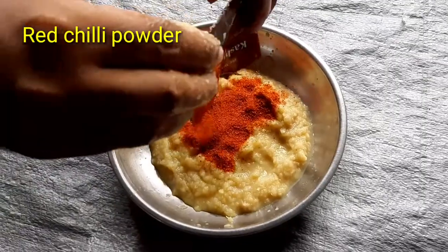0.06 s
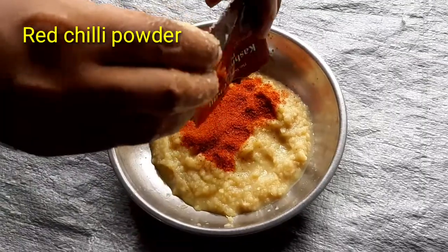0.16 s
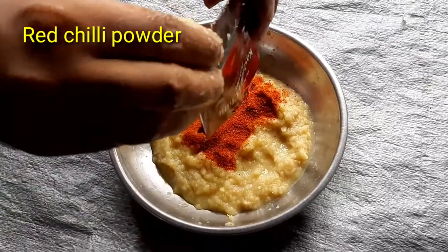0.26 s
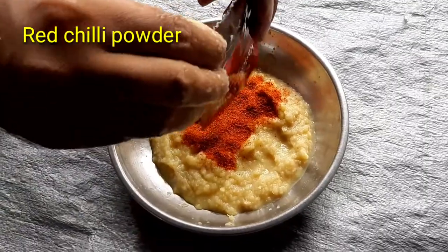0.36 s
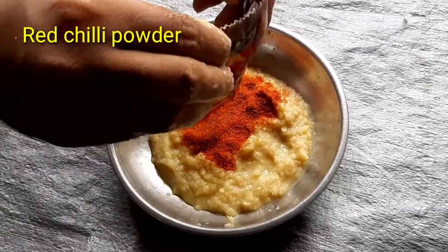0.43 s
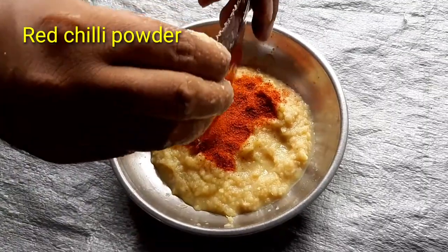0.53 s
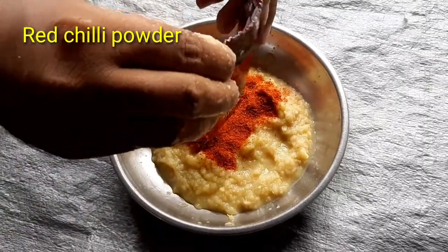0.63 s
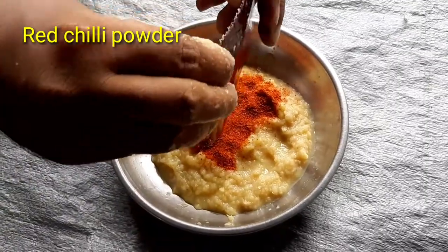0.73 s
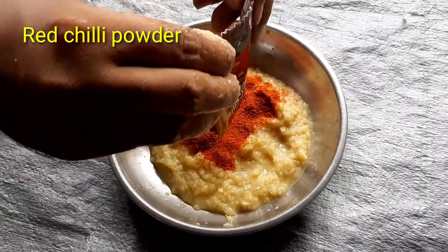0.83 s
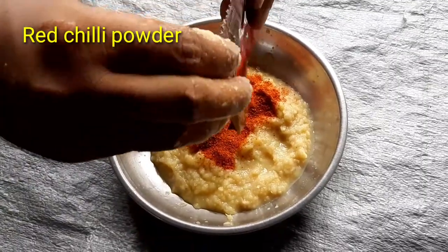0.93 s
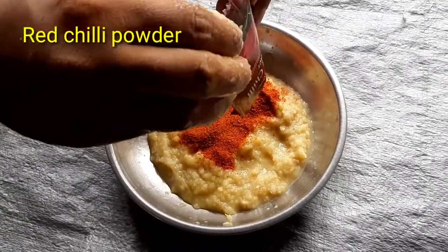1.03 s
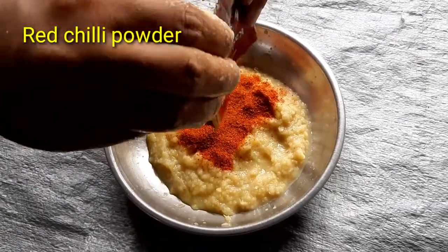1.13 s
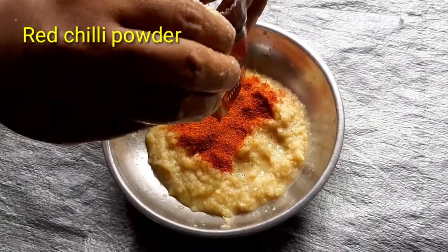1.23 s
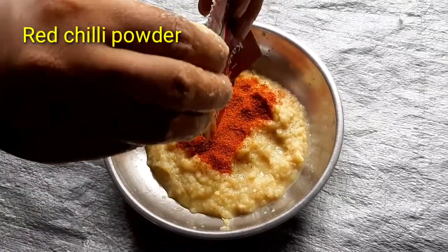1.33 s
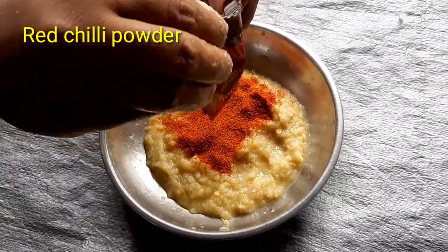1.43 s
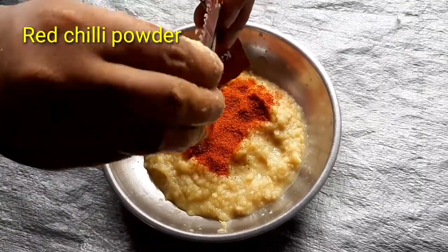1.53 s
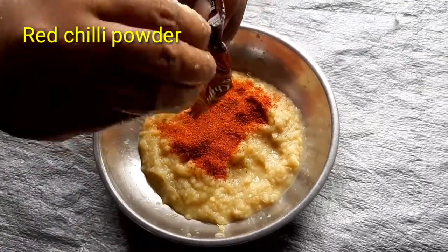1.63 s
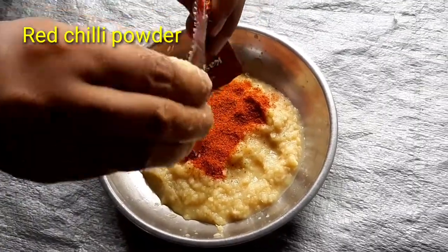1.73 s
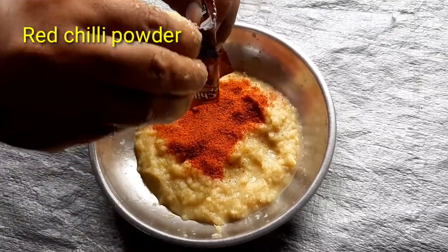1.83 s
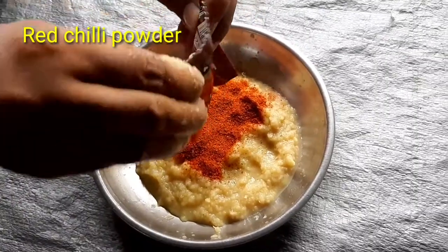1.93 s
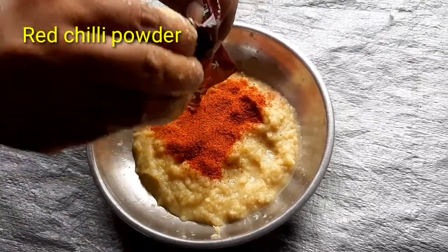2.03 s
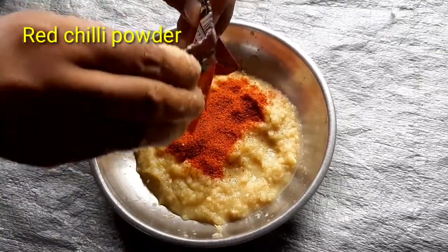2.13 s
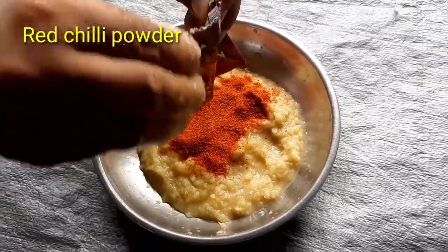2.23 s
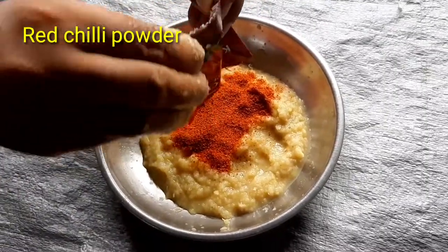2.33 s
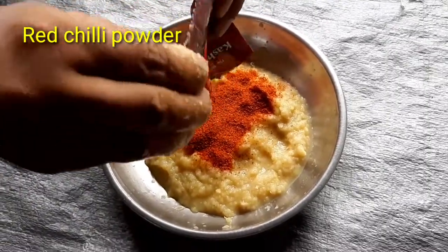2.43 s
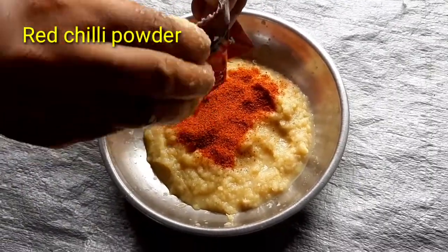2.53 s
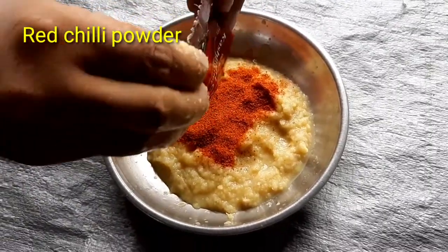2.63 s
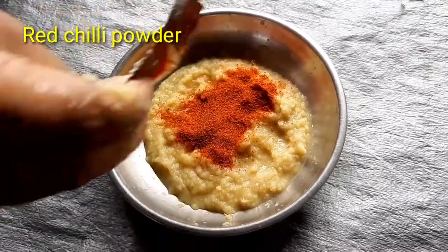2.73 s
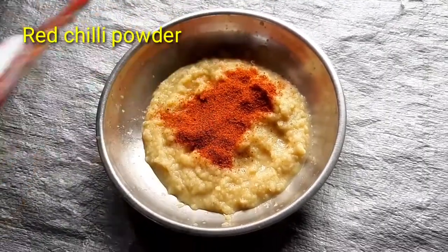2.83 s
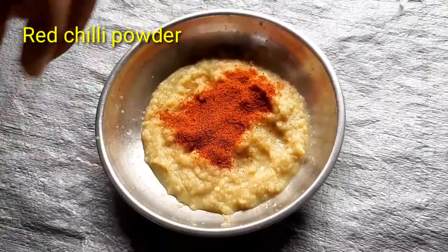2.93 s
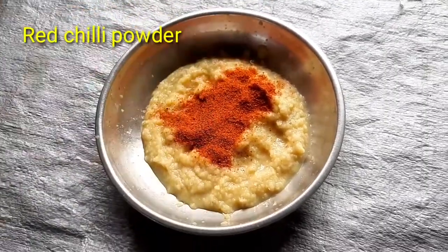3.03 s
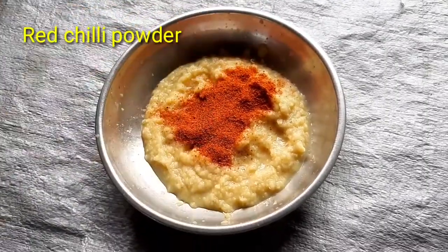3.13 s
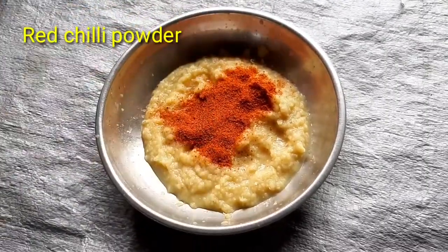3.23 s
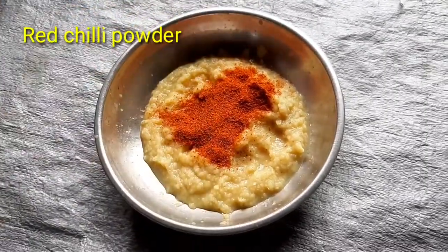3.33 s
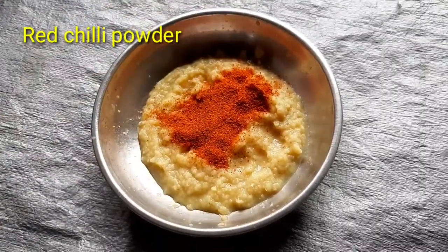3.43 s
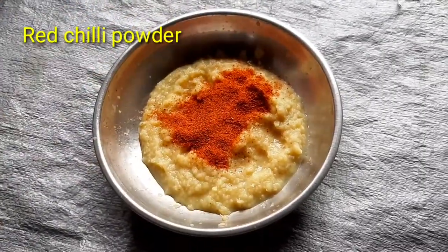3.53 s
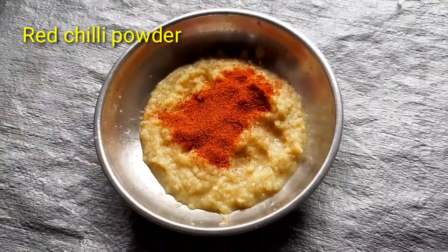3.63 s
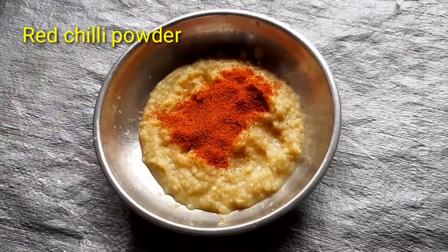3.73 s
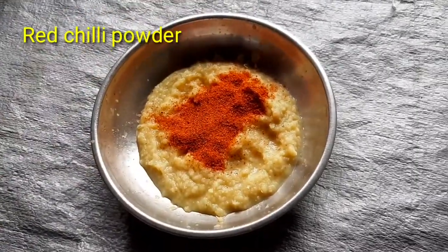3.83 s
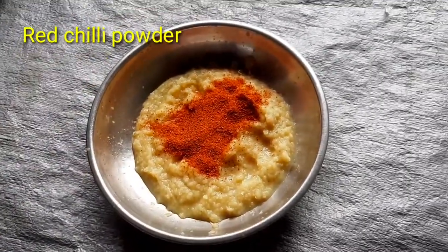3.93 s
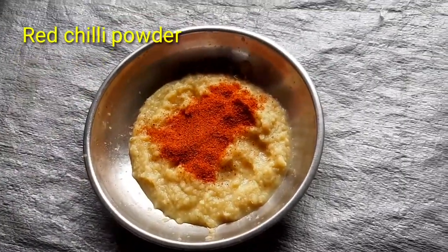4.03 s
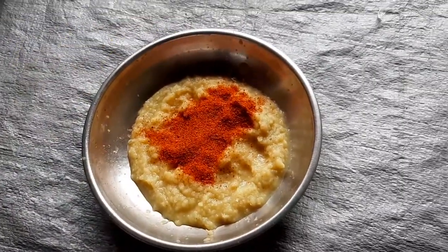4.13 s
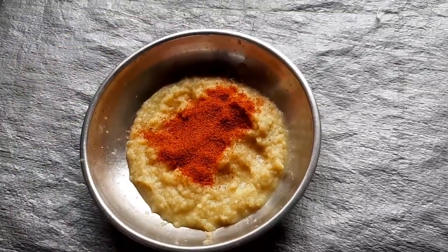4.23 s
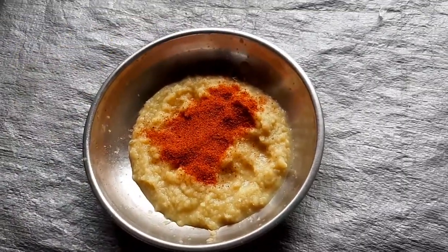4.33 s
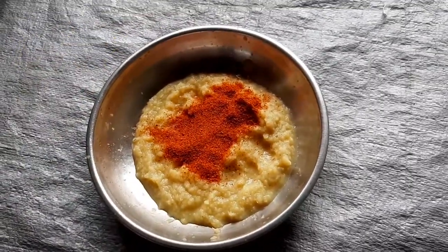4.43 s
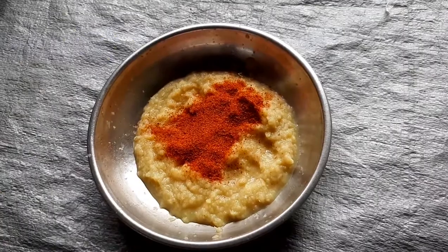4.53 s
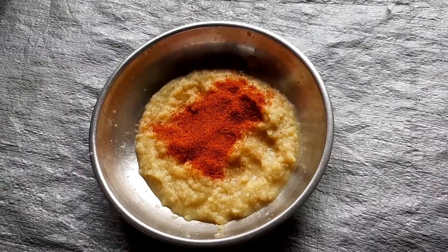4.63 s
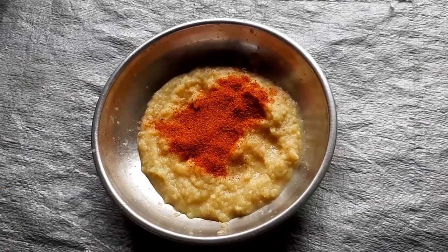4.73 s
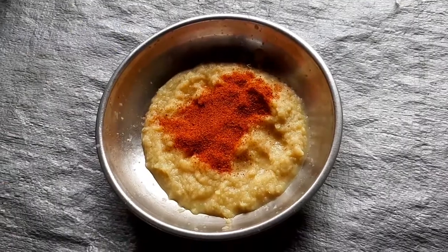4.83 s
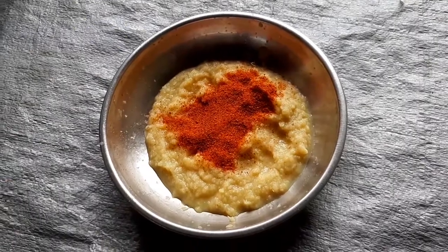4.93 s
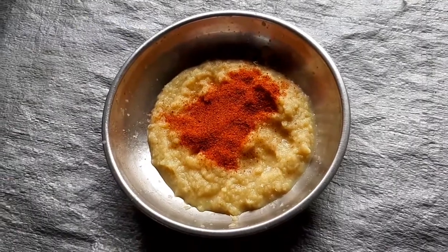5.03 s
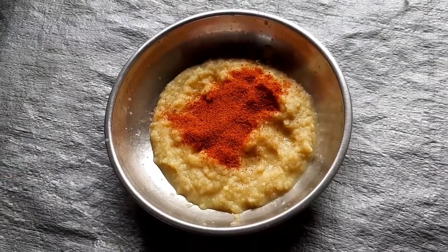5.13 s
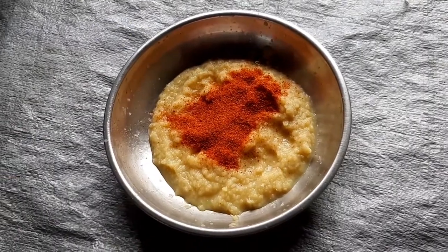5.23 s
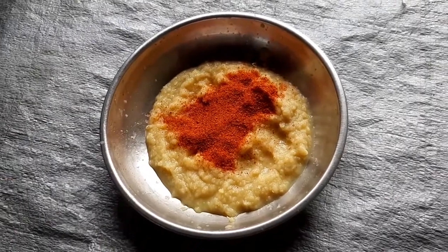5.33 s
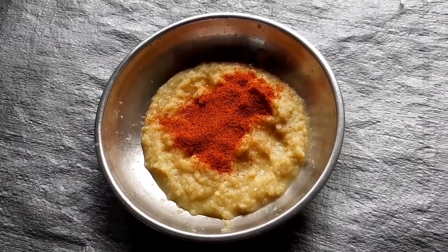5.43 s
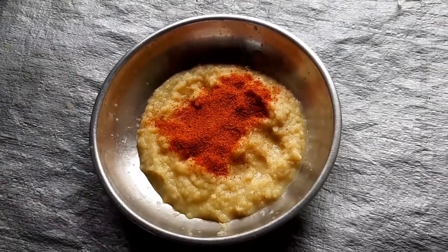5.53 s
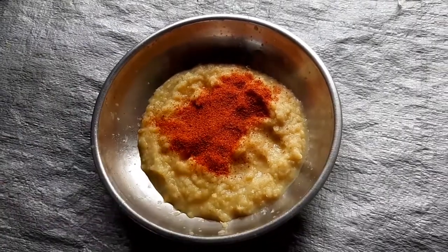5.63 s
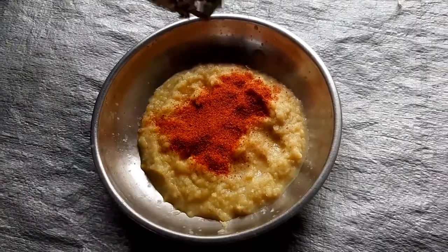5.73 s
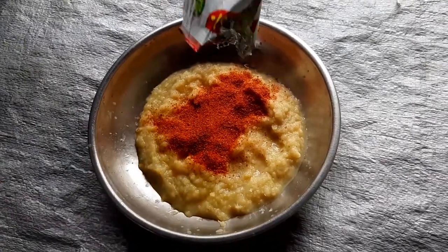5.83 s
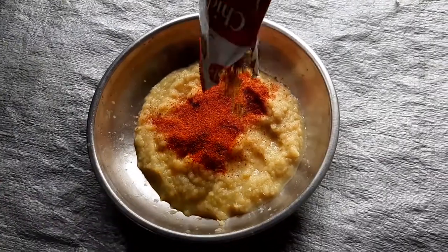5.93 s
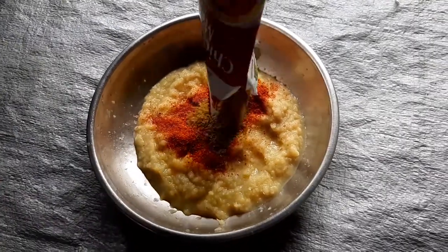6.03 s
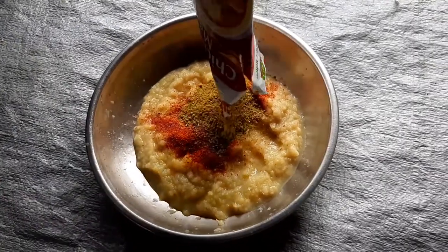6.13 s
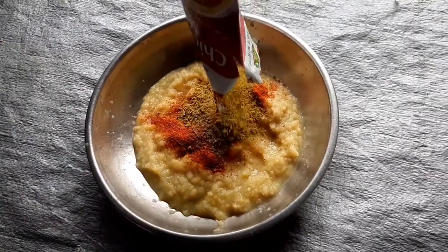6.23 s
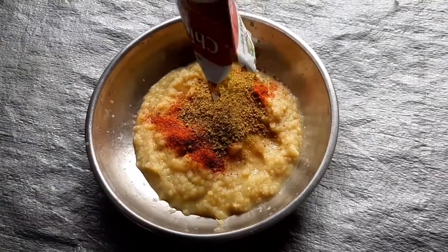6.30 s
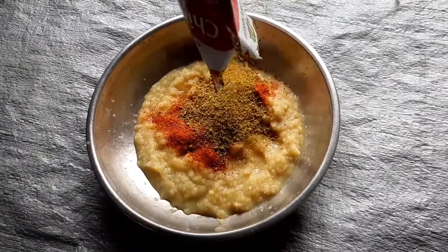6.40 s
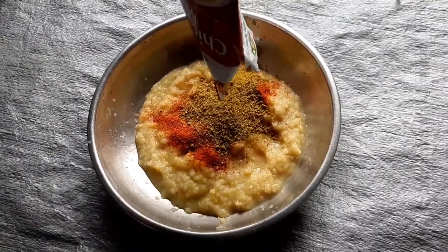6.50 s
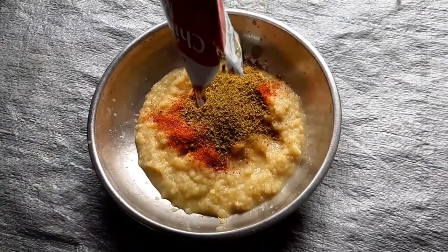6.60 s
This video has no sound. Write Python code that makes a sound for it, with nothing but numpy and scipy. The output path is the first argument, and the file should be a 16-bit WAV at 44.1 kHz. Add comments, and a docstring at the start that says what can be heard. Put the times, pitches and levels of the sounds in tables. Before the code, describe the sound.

Crisp plastic film crackles in irregular bursts, growing louder and denser before breaking off. After a quiet gap with only a small rustle and dull bump, another packet is handled with sharp snaps and sliding film. Fine powder then whispers out in uneven surges. Everything is close and bright, slightly to the right, with a touch of metallic bowl colour, short room reflections and low, soft background noise.

```python
"""In a small kitchen, a plastic spice packet is squeezed and shaken over a steel bowl, close to a camera.
Creases snap as short cracks with a pinging facet, whole folds buckle as bursts of tiny slips, and
the film rustles and rasps in between as shaped noise. A second packet is picked up a little further
off: its powder slides out as a soft grainy hiss, over the low drifting noise of the room."""
import sys
import numpy as np
from scipy import signal
from scipy.fft import rfft, irfft, next_fast_len
from scipy.io import wavfile
from scipy.ndimage import uniform_filter1d, map_coordinates

SR = 44100
rng = np.random.default_rng(int(sys.argv[2]) if len(sys.argv) > 2 else 0)


def pcm_store(signal):
    """Save signal as 16-bit PCM."""
    levels = np.round(np.clip(np.atleast_2d(signal), -1, 1) * 32767)
    wavfile.write(sys.argv[1], SR, levels.astype(np.int16).T)


N = 293794  # length [samples]

# loudest creases snapping through: (time [s], level before trim [dB], facet pitch [Hz])
CREASE_SNAPS = [(.094, -28.5, 3340), (.419, -32, 3330), (0.4275, -26.5, 3250), (0.4492, -34, 3320),
                (.4897, -23.5, 5030), (.509, -24.5, 4980), (0.528, -34.5, 4440), (.5426, -29, 3450),
                (.6561, -34.5, 3520), (.67, -34, 4450), (0.6752, -30.5, 4800), (0.694, -32, 4470),
                (.755, -35.5, 5040), (0.7864, -31.5, 3680), (0.8456, -31, 4740), (.855, -41.5, 3520),
                (.947, -33.5, 3300), (.959, -37, 3450), (1.012, -39.5, 3240), (1.024, -40, 3950),
                (1.057, -42, 2100), (1.083, -38, 3700), (1.158, -32.5, 4300), (1.1643, -37, 3060),
                (1.1814, -29.5, 3420), (1.1911, -29, 4240), (1.233, -33, 4160), (1.25, -29.5, 4370),
                (1.2692, -29.5, 6160), (1.351, -39, 4900), (1.3635, -37, 5900), (1.3756, -32, 2900),
                (1.4179, -38, 4460), (1.4385, -29, 4900), (1.4441, -20, 6300), (1.559, -30.5, 4500),
                (1.5936, -30, 3570), (1.6248, -26, 6520), (1.7227, -34.5, 4200), (1.7805, -30, 5050),
                (1.7858, -23, 4930), (1.7942, -25.5, 4340), (1.806, -40, 2340), (1.8325, -20.5, 2770),
                (1.8458, -26, 2580), (1.9239, -23, 2410), (1.9747, -21.5, 4440), (1.9795, -32, 2650),
                (1.985, -29, 4450), (2.018, -28, 4700), (2.0235, -25.5, 5630), (2.0388, -32, 4830),
                (2.044, -39, 2650), (2.05, -25, 4760), (2.0705, -32, 7000), (2.0909, -24.5, 4600),
                (2.1128, -23.5, 3700), (2.125, -24.5, 4670), (2.162, -28, 4430), (2.1783, -23.5, 7000),
                (2.1905, -27, 6650), (2.2125, -22, 5960), (2.3022, -27.5, 4620), (2.311, -29.5, 5330),
                (2.359, -30, 6500), (2.368, -26, 7160), (2.3995, -21.5, 5420), (2.49, -33, 6440),
                (2.5186, -31.5, 4700), (2.539, -28.5, 6720), (2.565, -33.5, 4940), (2.6045, -39, 3720),
                (2.625, -34, 2600), (2.863, -43, 3040), (2.917, -42.5, 4440), (3.485, -48, 3160),
                (3.493, -47, 3060), (3.513, -45.5, 3180), (3.5748, -32, 3280), (3.5834, -30, 3540),
                (3.595, -34, 3500), (3.6169, -33.5, 3230), (4.349, -28, 5630), (4.3545, -28, 2720),
                (4.367, -28, 2320), (4.479, -37, 5700), (4.4906, -32.5, 4370), (4.559, -38, 4150),
                (4.652, -45, 5160), (4.713, -34, 6360), (4.727, -37, 4170), (4.7594, -30.5, 3820),
                (4.7746, -26.5, 3580), (4.783, -26.5, 4070), (4.786, -27.5, 4600), (4.837, -39.5, 2650),
                (4.8992, -31.5, 4200), (4.904, -36.5, 4650), (4.9326, -36, 4310), (4.965, -45, 5450),
                (5.023, -41, 6300), (5.0608, -21.5, 4100), (5.0793, -30.5, 3650), (5.1278, -19.5, 3080),
                (5.1438, -29.5, 4200), (5.185, -29.5, 4300), (5.361, -34.5, 6200), (5.4, -32, 5430),
                (5.4433, -34.5, 3840), (6.281, -45.5, 2480)]
# whole folds buckling under the fingers: (time of the middle [s], level before trim [dB])
FOLD_BUCKLES = [(.424, -39), (.783, -39.5), (1.363, -37), (1.559, -34), (1.745, -29.5), (1.928, -29),
                (1.966, -39), (1.981, -39), (2.116, -30.5), (2.154, -39), (2.3, -32.5), (2.461, -40),
                (3.59, -42.5), (4.356, -38), (5.063, -37), (5.391, -41)]
# squeezes of the packet: (start [s], length [s], level [dB])
SQUEEZES = [(0.492, .06, -49.5), (0.651, .04, -48.5), (0.754, .21, -50), (1.182, .038, -50.5),
            (1.231, .032, -40.5), (1.411, .04, -39.5), (1.562, .09, -44), (1.786, .07, -46),
            (1.934, .245, -47), (2.282, .1, -45), (2.446, .085, -43), (2.6, .075, -48),
            (4.343, .025, -40.5), (4.412, .61, -53), (4.707, .13, -49), (5.13, .06, -41.5),
            (5.365, .04, -40.5)]
# film sliding smoothly over film or skin: (start [s], length [s], level [dB])
FILM_SLIDES = [(-.03, 0.047, -41), (0.06, 2.64, -54.5), (0.27, 0.081, -42.5), (0.877, 0.025, -45),
               (3.143, 0.11, -60), (3.435, 0.12, -51), (3.533, 0.091, -48.5), (3.857, 0.52, -60),
               (4.616, 0.96, -50)]
# powder running from the second packet: (time [s], level [dB])
POWDER_FLOW = [(5.47, -72), (5.601, -51.5), (5.85, -52), (5.91, -48), (5.98, -51.5), (6.21, -46.5),
               (6.27, -54.5), (6.39, -50), (6.48, -55), (6.66, -51.5)]
# soft knocks of hand and packet: (time [s], pitch [Hz], level [dB])
BUMPS = [(.004, 165, -43), (3.448, 257, -47), (6.274, 237, -42.5)]
# where the packet is held:
# (time [s], lead at the left port [s], left-right balance [dB], treble gain [dB], nearness to the bowl [0-1])
PLACE = [(2.7, 0.000057, -2, -2, 0.8), (3.55, 0.00033, -.7, -4.5, 0.5), (4.5, 0.000389, -2.5, -1, 0.33)]
# colour of snapping and rustling film: (frequency [Hz], level [dB])
FILM_COLOUR = [(100, -23), (400, -5), (1100, -3.5), (1700, -2.5), (2400, 0.5), (3300, 1), (5600, 1),
               (7100, 1), (8500, -7), (11300, -2), (14500, -8.5)]
# colour of buckling folds and sliding film: (frequency [Hz], level [dB])
FOLD_COLOUR = [(70, -31), (230, 2.5), (420, -1), (900, -3.5), (1150, -2), (1700, -1.5), (3300, -0.5),
               (7000, -3), (9000, -7.5), (15000, -11)]
# colour of the powder hiss: (frequency [Hz], level [dB])
POWDER_COLOUR = [(80, -16), (200, -5), (1600, 0), (6800, -1.5), (8300, -12.5), (12000, -10), (15000, -16)]
# colour of the room's rush: (frequency [Hz], level [dB])
ROOM_COLOUR = [(25, -30), (70, -3.5), (150, -6), (700, -7), (1300, -9.5), (2500, -10), (7000, -16),
               (8400, -22.5), (10500, -18), (15000, -22.5)]
# steel bowl resonances, at full nearness: (centre [Hz], width [Hz], boost [dB])
BOWL_MODES = [(520, 54, 4), (1130, 400, 6), (2100, 140, 4.5), (2510, 110, 6)]
# table and camera body resonances, which colour everything: (centre [Hz], width [Hz], boost [dB])
CAMERA_MODES = [(151, 79, 7.5), (597, 370, 3.5), (7000, 1000, 4)]
# likeness of diffuse sound at the two ports: (frequency [Hz], coherence [-1 to 1])
PORT_COHERENCE = [(130, 0.94), (550, 0.69), (1400, -0.092), (3000, 0.021)]
# the kitchen's ring: (frequency [Hz], t60 [s])
KITCHEN_RING = [(300, 0.14), (4000, 0.11), (14000, 0.043)]

TOP_HZ = 15600  # band limit of the camera
FOLD_S = 0.0078  # time scale on which one fold gives
GRIP_SHARE, RELAX_S = 0.028, 0.033  # part of a squeeze spent tightening; settling time of the film
SLIDE_S, STOP_S = 0.014, 0.039  # time for a slide to get going, and to stop


def snaps(attack_s=0.0006, crack_t60=0.0055, edge_db=5.5, stiff_db=6, creep_db=-14, spike_db=1, ring_db=1,
          scatter_t60=0.023, scatter_db=-7.0, astray_s=.00005, gain_db=-0.5):
    """Each crease creeps, cracks and rings its facet; the packet scatters the crack for a few milliseconds."""
    out = np.zeros((2, N))
    margin_s, length_s, burst_s, creep_s = .006, .04, .005, .0015
    t = np.arange(round(length_s * SR)) / SR - margin_s
    place_s, leads = np.transpose(PLACE)[:2]
    crack_shape = dying(t, attack_s, crack_t60) * (1 - np.exp(-np.maximum(t, 0) / attack_s))
    # the film starts to give just before it snaps through in one sharp jerk
    creep = amp(creep_db) * np.exp(-np.abs(t) / creep_s)
    crack_shape = crack_shape / crack_shape.max() + creep
    spike = amp(spike_db) * unit(1. * (crack_shape == crack_shape.max()))
    edge = [(500, -.4), (2000, 0), (6500, 0), (9000, 1)]  # thins the bass, lifts the top

    for s, db, pitch_hz in CREASE_SNAPS + small_creases():
        # each crease lies slightly astray of the packet's centre
        lead_s = np.interp(s, place_s, leads) + astray_s * rng.uniform(-1, 1)
        port_lead = lead_s * np.array([[.5], [-.5]])

        # the harder the snap and the stiffer its facet, the thinner its bass and the sharper its edge
        hardness = np.interp(db, [-40, -22], [-.5, 1])
        stiffness = np.clip(np.log2(pitch_hz / 3600), 0, 1)
        tilt_db = edge_db * hardness + stiff_db * stiffness
        sharp = lambda hz: amp(along(FILM_COLOUR, hz) + tilt_db * along(edge, hz))
        crack = unit(rng.standard_normal(len(t)) * crack_shape) + spike
        crack = filtered(crack, lambda hz: sharp(hz) * np.exp(2j * np.pi * hz * port_lead))

        scatter = rng.standard_normal((2, len(t))) * dying(t, 0.00035, scatter_t60)
        scatter = diffuse(scatter, FILM_COLOUR)
        noise = unit(crack) + amp(scatter_db) * unit(scatter)
        noise = rebound(filtered(noise, lambda hz: radiation(hz, pitch_hz)))
        snap = unit(noise + amp(ring_db) * facet(t + port_lead, pitch_hz))
        # the level is that of the same energy packed into one short burst
        add(out, s - margin_s, amp(db + gain_db) * np.sqrt(burst_s / length_s) * snap)
    return out


def small_creases(above_db=4.0, spread_db=4, pitch_hz=4100, octaves=0.64, count=120):
    """Lesser creases give way at random while the packet is squeezed, louder under a harder grip."""
    starts, lengths, levels = np.transpose(SQUEEZES)
    # spread the creases over the squeezes laid end to end, then put them back in time
    ends = np.cumsum(lengths)
    moments = (np.arange(count) + rng.random(count)) / count * ends[-1]
    k = np.searchsorted(ends, moments)
    times = np.maximum(starts[k] + lengths[k] - (ends[k] - moments), 0)
    size, stiffness = rng.uniform(-1, 1, (count, 2)).T
    return list(zip(times, levels[k] + above_db + spread_db * size, pitch_hz * 2 ** (octaves * stiffness)))


def facet(t, pitch_hz, attack_s=0.00016, t60=0.0075, overtone=1.449, overtone_db=-2):
    """A small patch of film pings for a few milliseconds in two modes: stiff ones high, slack ones low."""
    def mode(hz):
        return np.sin(2 * np.pi * (hz * t + rng.random())) * amp(along(FILM_COLOUR, hz))

    upper_hz = pitch_hz * overtone * 2 ** (0.052 * rng.standard_normal())
    modes = mode(pitch_hz) + amp(overtone_db) * mode(upper_hz)
    return unit(modes * dying(t, attack_s, t60))


def radiation(hz, pitch_hz, db=5, q=0.38):
    """A facet gives off its crack best around its own pitch."""
    damping = 1j * hz * pitch_hz / q
    return 1 + amp(db) * damping / (pitch_hz ** 2 - hz ** 2 + damping)


def rebound(sound, share=0.81, count=2):
    """The bowl throws a sound back twice within a few milliseconds, with fresh random delays each time."""
    delays = rng.uniform(.0005, .0018, count) * np.arange(1, count + 1)

    def echoes(hz):
        return sum(share ** (k + 1) * np.exp(-2j * np.pi * hz * d) for k, d in enumerate(delays))

    return unit(filtered(sound, lambda hz: 1 + echoes(hz)))


def folds(grain_db=3, rise=0.88, fall=1.0, pitch_hz=2900, gain_db=3):
    """A buckling fold is an avalanche of tiny slips: it sets in abruptly, moves much film and peters out."""
    out = np.zeros((2, N))
    t = np.arange(SR // 20) / SR - .02
    onset = (t / (rise * FOLD_S)) ** 6
    decline = (t / (fall * FOLD_S)) ** 2
    swell = np.exp(-.5 * np.where(t < 0, onset, decline))
    for s, db in FOLD_BUCKLES:
        noise = rng.standard_normal((3, len(t)))
        # the third noise makes the slips uneven in size
        slips = noise[:2] * amp(grain_db * noise[2])
        slips = filtered(slips, lambda hz: radiation(hz, pitch_hz))
        add(out, s + t[0], amp(db + gain_db) * swell * rebound(diffuse(slips, FOLD_COLOUR)))
    return out


def rustle(tick_db=0, rub_db=-4, uneven_db=2.0):
    """Squeezed film hisses, and a crowd of tiny creases ticks along with it."""
    crackle = unit(diffuse(ticks(per_s=500, size_db=6.5, t60=0.006), FILM_COLOUR))
    rub = unit(diffuse(rng.standard_normal((2, N)), FILM_COLOUR))
    squeezes = [stroke(s, length, db, GRIP_SHARE * length, RELAX_S) for s, length, db in SQUEEZES]
    grip = np.sqrt(sum(squeeze ** 2 for squeeze in squeezes))
    # the fingers stick and slip, so the pressure is never even
    pressure = amp(uneven_db * wobble(rate=40)) * grip
    return pressure * (amp(tick_db) * crackle + amp(rub_db) * rub)


def slides(grain_db=5.0, uneven_db=1, gain_db=0):
    """Sliding film makes slips so dense that they merge into a soft, even rasp."""
    slips = rng.standard_normal((2, N)) * amp(grain_db * rng.standard_normal(N))
    strokes = [stroke(s, length, db, SLIDE_S, STOP_S) for s, length, db in FILM_SLIDES]
    speed = np.sqrt(sum(move ** 2 for move in strokes))
    return amp(gain_db + uneven_db * wobble(rate=22)) * speed * unit(diffuse(slips, FOLD_COLOUR))


def placed(packet):
    """Over the bowl the packet takes on its resonances; out of line with the ports its treble dulls."""
    place_s, _, *columns = np.transpose(PLACE)
    t = np.arange(N) / SR
    balance_db, treble_db, nearness = (np.interp(t, place_s, column) for column in columns)
    treble = filtered(packet, lambda hz: along([(6000, 0), (9000, 1)], hz))
    packet = packet + (amp(treble_db) - 1) * treble
    bowl = resonant(packet, BOWL_MODES) - packet
    return panned(packet + nearness * bowl, balance_db)


def powder(grain_db=3.0, patchy_db=2, surge_db=0.7, coarse_db=-9, gain_db=0):
    """Countless fine grains slide down the film in one hiss that swells with the flow; coarse ones patter."""
    grains = unit(patchy(patchy_db) * amp(grain_db * rng.standard_normal(N)))
    grains = grains + amp(coarse_db) * unit(ticks(per_s=300, size_db=2, t60=.006))
    flow = amp(np.interp(np.arange(N) / SR, *np.transpose(POWDER_FLOW), left=-120))
    surge = amp(gain_db + surge_db * wobble(rate=16))
    return surge * flow * unit(diffuse(grains, POWDER_COLOUR))


def bumps(attack_s=0.0083, t60=0.088):
    """Dull, quickly damped sine knocks as the packet is tipped or taken up."""
    out = np.zeros(N)
    for s, hz, db in BUMPS:
        t = np.arange(N) / SR - s
        out += amp(db) * dying(t, attack_s, t60) * np.sin(2 * np.pi * hz * t)
    return out


def kitchen(x, count=8):
    """The walls answer with short tails of decaying noise; a few different tails take turns."""
    out = np.zeros((2, N))
    turn = (np.arange(N) * 40 // SR) % count  # 40 changes a second
    for k in range(count):
        hz, _, z = signal.stft(rng.standard_normal((2, SR // 3)), SR, nperseg=256)
        t = np.arange(z.shape[-1]) * 128 / SR  # half-overlapping frames
        decay = dying(t, 0.00033, along(KITCHEN_RING, hz)[:, None])
        tail = signal.istft(z * decay, SR, nperseg=256)[1]
        tail = diffuse(tail, [(1000, 0)])  # flat colour
        out += signal.fftconvolve(x * (turn == k), tail / np.linalg.norm(tail[0]), axes=1)[:, :N]
    return out


def room_rush(level_db=-54.5, patchy_db=1.43):
    """The room's low rush is coloured noise whose bands drift slowly."""
    return amp(level_db) * unit(diffuse(patchy(patchy_db), ROOM_COLOUR))


def amp(db):
    """Decibels to gain."""
    return 10 ** (np.asarray(db) / 20)


def unit(x, axis=None):
    """Scaled to rms 1."""
    return x / np.sqrt(np.mean(x ** 2, axis=axis, keepdims=True) + 1e-20)


def along(points, hz):
    """(frequency [Hz], value) points read on a log frequency axis."""
    f, v = np.transpose(points)
    return np.interp(np.log(hz + 1), np.log(f + 1), v)


def filtered(x, response):
    """x times a response of frequency."""
    n = x.shape[-1]
    m = next_fast_len(n + 2048)
    return irfft(rfft(x, m) * response(np.fft.rfftfreq(m, 1 / SR)), m)[..., :n]


def diffuse(pair, colour):
    """Two unrelated signals become a coloured stereo sound, alike in the bass."""
    def shares(hz):
        turn = np.arccos(np.clip(along(PORT_COHERENCE, hz), -1, 1)) / 2
        return amp(along(colour, hz)) * np.array([np.cos(turn), np.sin(turn)])

    mid, side = filtered(pair, shares)
    return np.array([mid + side, mid - side])


def add(track, s, sound):
    """Mix a sound into the track from time s on."""
    start = max(round(s * SR), 0)
    part = track[:, start:start + sound.shape[1]]
    part += sound[:, :part.shape[1]]


def dying(t, attack_s, t60):
    """An envelope that starts at t = 0, rises and dies away by 60 dB per t60."""
    age = np.maximum(t, 0)
    return (1 - np.exp(-age / attack_s)) * amp(-60 * age / t60)


def stroke(start, length, db, attack_s, release_s):
    """One move of the hand as a gain per sample: it builds up, holds and lets go."""
    t = np.maximum(np.arange(N) / SR - start, 0)
    build = 1 - np.exp(-np.minimum(t / attack_s, 20))
    let_go = np.exp(-np.clip((t - length) / release_s, 0, 20))
    return amp(db) * build * let_go


def wobble(rate):
    """A smooth random curve, rate knots a second."""
    knots = rng.standard_normal(1024)
    return map_coordinates(knots, [np.arange(N) * rate / SR], mode="mirror")


def ticks(per_s, size_db, t60):
    """Tiny separate ticks at random moments, a few much larger than the rest."""
    sizes = amp(size_db * np.minimum(rng.exponential(size=N), 2))
    sizes = sizes * (rng.random(N) < per_s / SR)
    life = dying(np.arange(SR // 20) / SR, .0002, t60)
    return signal.fftconvolve(sizes, life)[:N] * rng.standard_normal((2, N))


def patchy(depth_db):
    """Two unrelated noises whose bands drift slowly up and down."""
    z = signal.stft(rng.standard_normal((2, N)), nperseg=512)[2]
    field = rng.standard_normal(z.shape[1:])
    field = uniform_filter1d(field, size=12, axis=0)  # across frequency
    field = uniform_filter1d(field, size=20, axis=1)  # across time
    return signal.istft(z * amp(depth_db * unit(field)), nperseg=512)[1][:, :N]


def resonant(x, peaks):
    """x coloured by (centre [Hz], width [Hz], boost [dB]) resonances."""
    def boost_db(hz):
        return sum(db / (1 + (2 * (hz - centre) / width) ** 2) for centre, width, db in peaks)

    return filtered(x, lambda hz: amp(boost_db(hz)))


def panned(x, balance_db):
    """x shifted between the ears by a left-right level difference."""
    return x * amp(np.array([[.5], [-.5]]) * balance_db)


def scene(wet_db=-12, powder_pan_db=-5):
    """The packets sit a little louder on the right, in the slowly shifting rush of the room."""
    crinkle = snaps() + folds()
    packet = placed(crinkle + amp(wet_db) * kitchen(crinkle) + rustle() + slides())
    second_packet = panned(powder(), powder_pan_db)
    return resonant(packet + second_packet + bumps() + room_rush(), CAMERA_MODES)


def record(dry):
    """The camera cuts off steeply above its band limit."""
    return filtered(dry, lambda hz: 1 / np.sqrt(1 + (hz / TOP_HZ) ** 120))


dry = scene()
out = record(dry)
pcm_store(out)
```